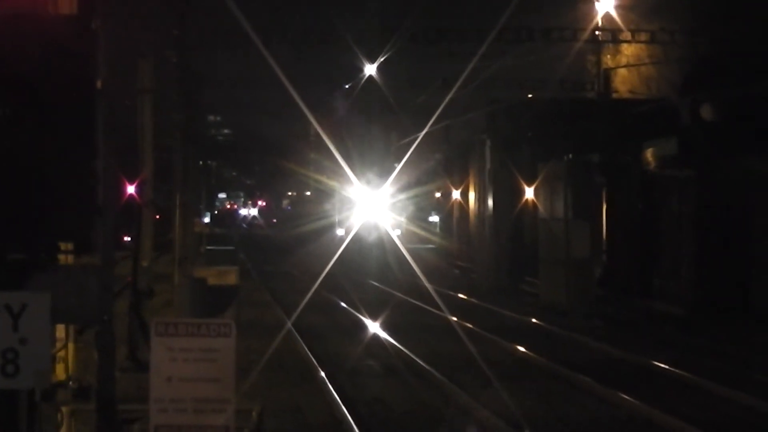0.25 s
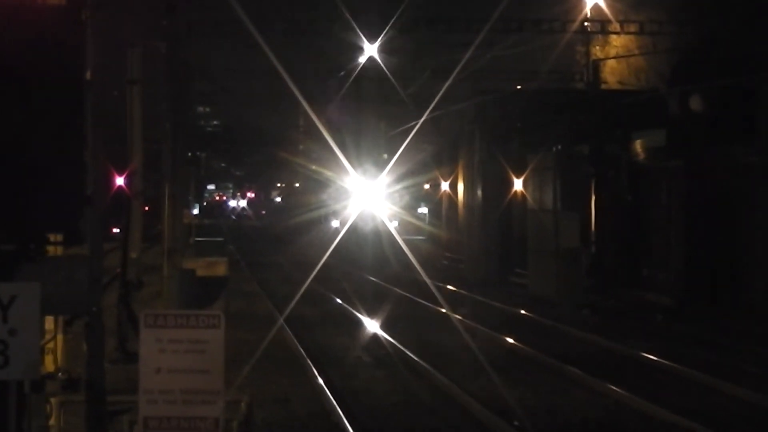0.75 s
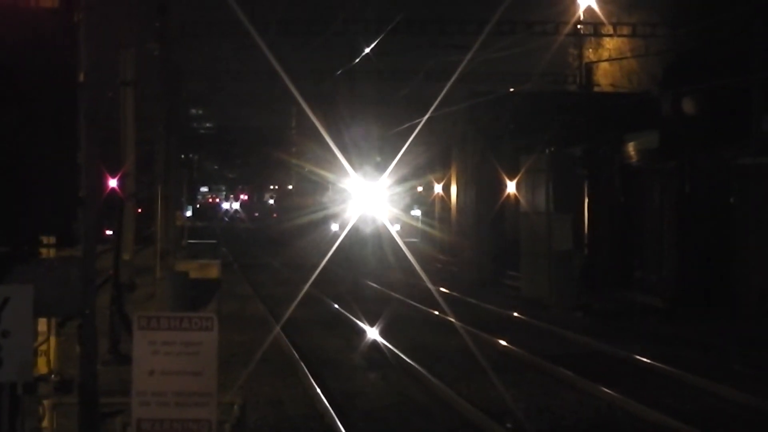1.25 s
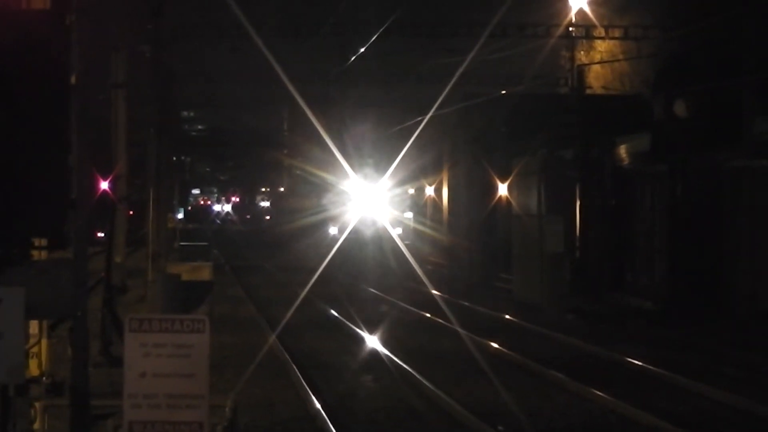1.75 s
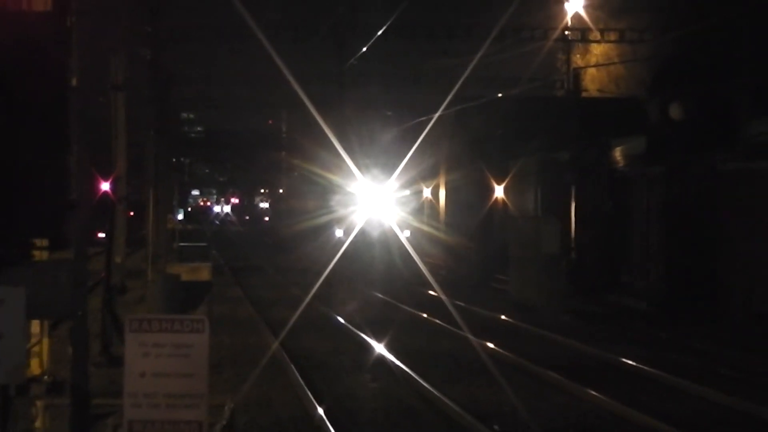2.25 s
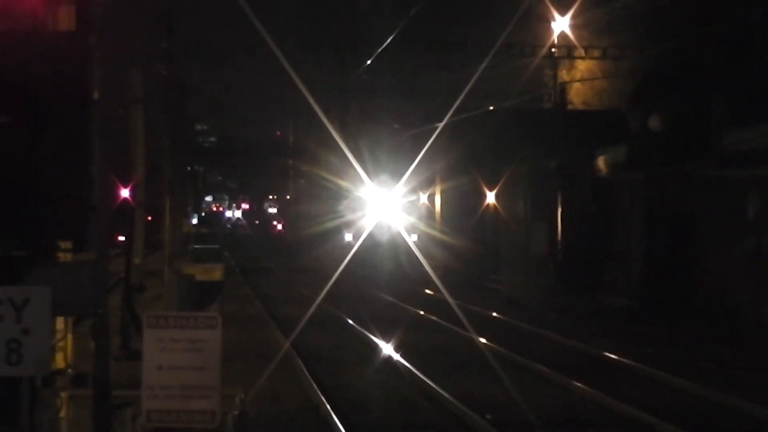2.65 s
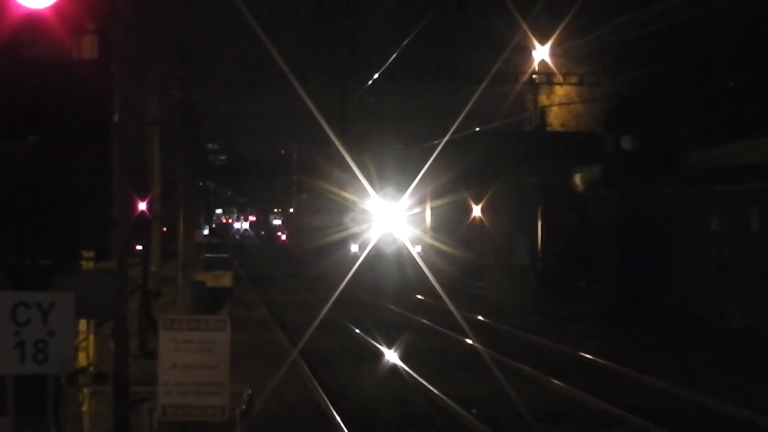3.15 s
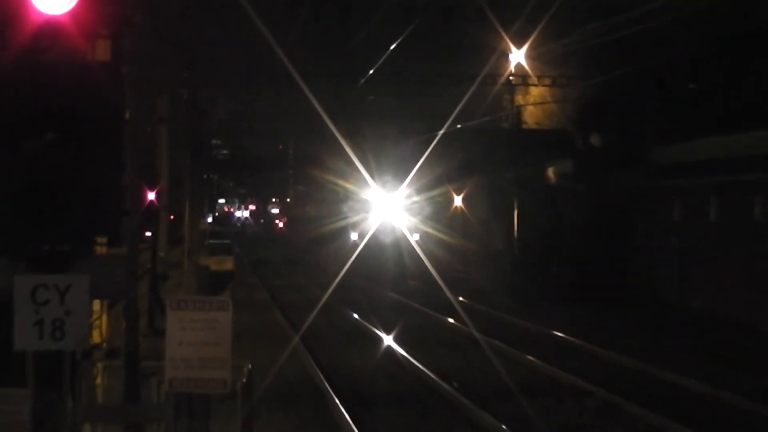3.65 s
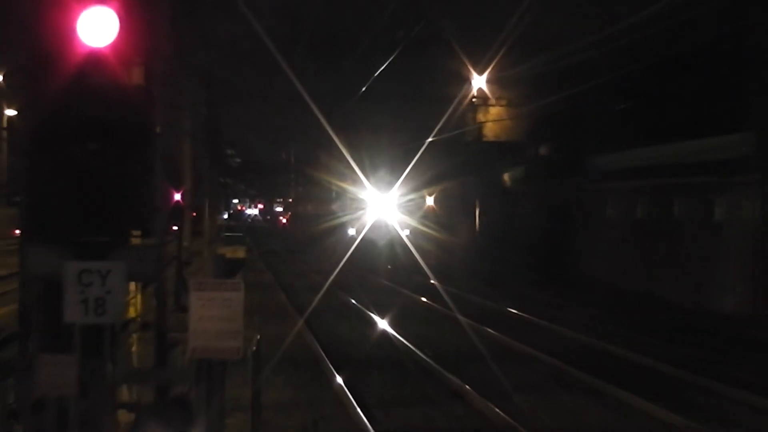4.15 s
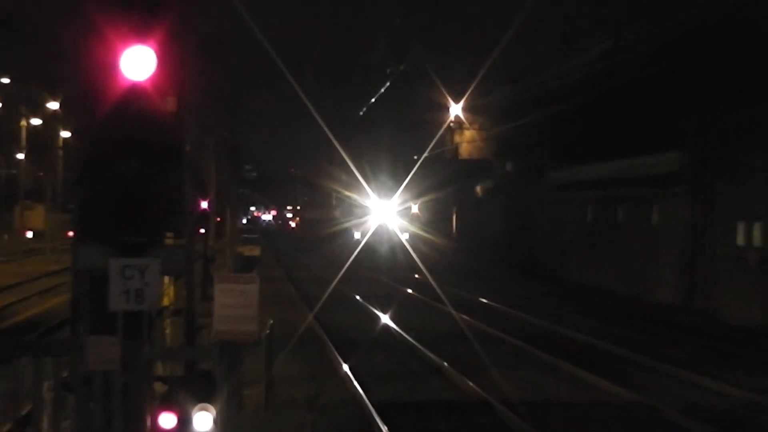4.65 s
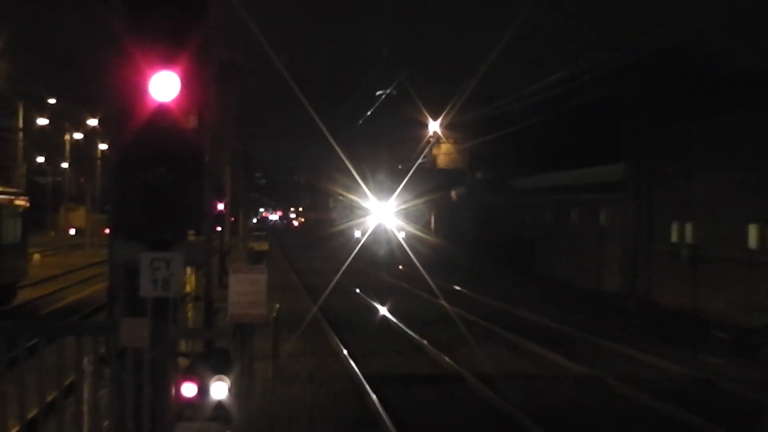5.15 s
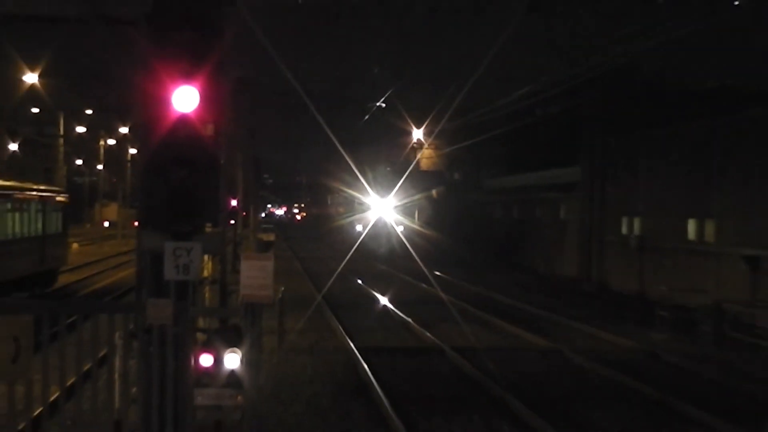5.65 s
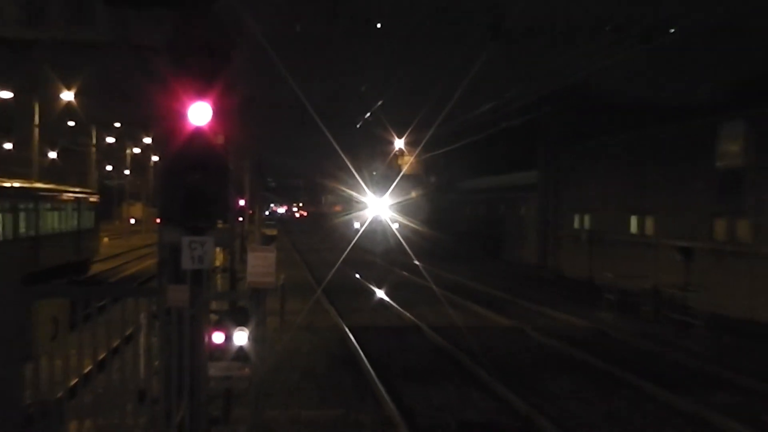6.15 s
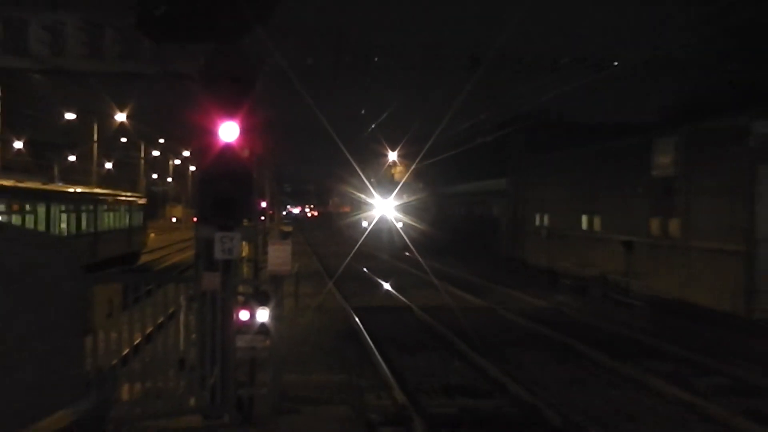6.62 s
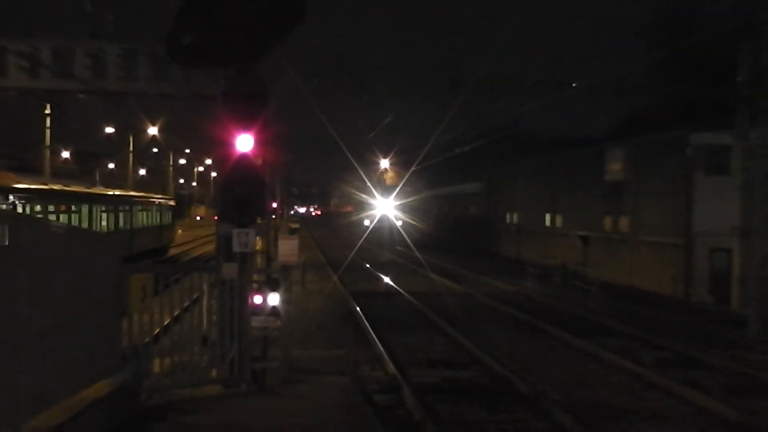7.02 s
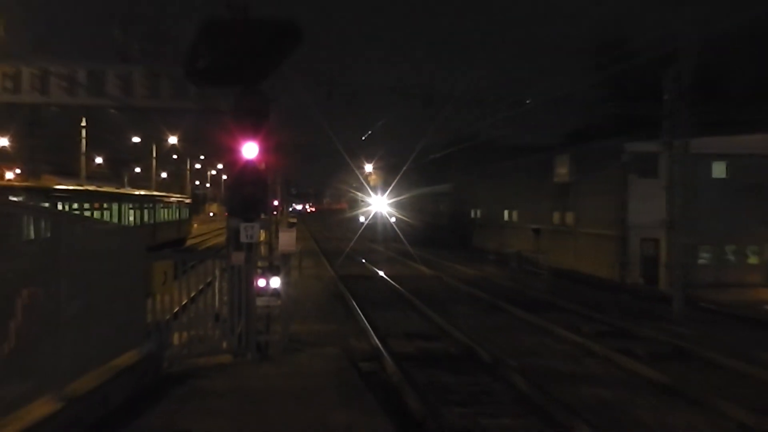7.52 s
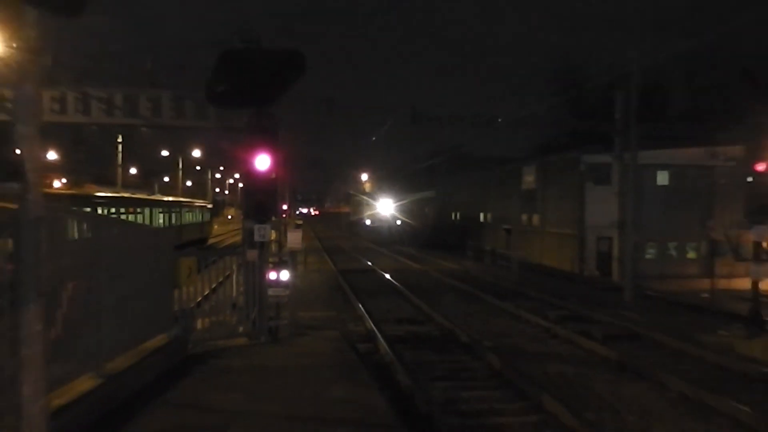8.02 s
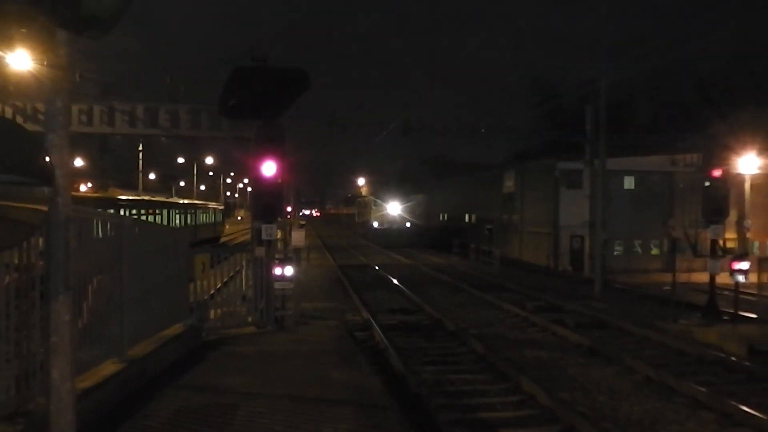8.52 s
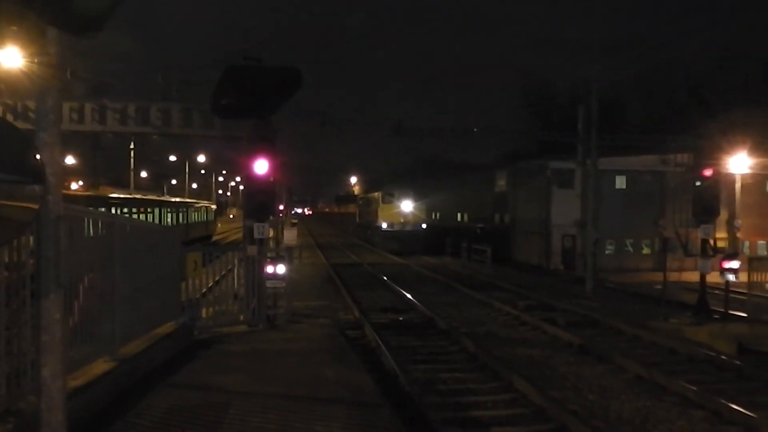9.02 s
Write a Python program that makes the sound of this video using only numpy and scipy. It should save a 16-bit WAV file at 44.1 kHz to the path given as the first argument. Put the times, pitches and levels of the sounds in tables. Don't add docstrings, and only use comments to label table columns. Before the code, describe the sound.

A distant low diesel drone with blower whine and small gear squeaks swells steadily into a close, pulsing engine roar in a rail yard.

```python
import sys
import numpy as np
from scipy import signal
from scipy.io import wavfile
from scipy.ndimage import uniform_filter1d, minimum_filter1d

SR = 44100
rng = np.random.default_rng(int(sys.argv[2]) if len(sys.argv) > 2 else 0)


def master_out(mix):
    frames = np.transpose(np.atleast_2d(mix))
    ceiling = np.clip(frames, -1, 1)
    pcm = np.round(ceiling * 32767).astype(np.int16)
    wavfile.write(sys.argv[1], SR, pcm)


def boost_factor(decibels):
    exponent = np.asarray(decibels, float) / 20
    return 10 ** exponent


N = 409248

# time in seconds, nearness from 0 (far) to 1 (near).
NEARNESS = [(0, 0.01), (2, 0.16), (4, 0.35), (6, 0.55), (7.5, 0.84), (8.5, 0.99), (9.28, 1.12)]
# time in seconds, body level in dB.
ROAR_BODY = [(0, -22.5), (1.3, -21.5), (2.1, -20.5), (2.5, -20.5), (3.4, -18.5), (4.3, -19), (4.6, -17),
             (5.6, -17.5), (6.5, -17.5), (7.1, -17), (7.6, -19), (8, -16.5), (8.3, -17), (8.9, -16.5),
             (9.28, -17)]
# time in seconds, ground level in dB, engine block level in dB.
RUMBLE_LEVELS = [(0, -40, -23.5), (.45, -38.5, -22.5), (.9, -40, -24.5), (1.05, -37.5, -25),
                 (1.6, -36, -26), (2.05, -36, -22), (2.5, -36, -21), (3.4, -33, -25), (4.2, -35, -21.5),
                 (4.5, -30.5, -25.5), (4.7, -33, -20.5), (6, -34, -20.5), (7.1, -37, -23.5),
                 (7.6, -47, -28.5), (8.2, -46, -24.5), (8.6, -38, -23.5), (9.28, -39.5, -26.5)]


def evened(x):
    return x / np.sqrt(np.mean(abs(x) ** 2) + 1e-20)


def curves(rows, t):
    s, *columns = np.transpose(rows)
    return [np.interp(t, s, c) for c in columns]


def read(points, hz, edge_db=None):
    f, value = np.transpose(points)
    return np.interp(np.log(hz + 1), np.log(f + 1), value, edge_db, edge_db)


def bump(t, s, rise, fall):
    return np.exp(-((t - s) / np.where(t < s, abs(rise), abs(fall))) ** 2)


def drift(top_hz, t):
    f = np.geomspace(top_hz / 20, top_hz, num=24)
    phase_turns = np.outer(t, f) + rng.random(len(f))
    return evened(np.sin(2 * np.pi * phase_turns) @ f ** -.5)


def slow(top_hz):
    t = np.arange(N) / SR
    return np.interp(t, t[::441], drift(top_hz, t[::441]))


def per_band(shape_db, band):
    return shape_db - 10 * np.log10((boost_factor(shape_db[band]) ** 2).sum(0))


def noise(level_db, same, size):
    # frequency in Hz, phase in radians by which left leads.
    lead = [(0, -0.27), (3790, -0.0), (5340, -0.16), (6720, 0.1), (7670, 1.2), (8180, 1.6), (9130, -1.0),
            (9730, -0.5), (11000, -0.1), (13300, 0.1), (15200, -0.0)]
    # frequency in Hz, left minus right in dB.
    balance_db = [(60, 2.4), (700, 1), (1290, 2.5), (2400, 1), (4400, 1), (6900, -3.5), (7700, 0.5),
                  (8400, 4), (9200, 2.5), (10500, -1), (15000, -1)]
    hz = np.fft.rfftfreq(size, 1 / SR)
    t = np.arange(4 * N // size + 5) * size / 4 / SR
    a, b, c, d = rng.standard_normal((len(t), len(hz), 4)).T
    likeness = np.clip(same(hz), -1, 1)[:, None]
    left = a + 1j * b
    shared = likeness * left * np.exp(-1j * read(lead, hz))[:, None]
    right = shared + np.sqrt(1 - likeness ** 2) * (c + 1j * d)
    tilt = boost_factor(read(balance_db, hz) / 2)[:, None]
    z = np.array([left * tilt, right / tilt]) * boost_factor(level_db(hz, t))
    return signal.istft(z, nperseg=size, noverlap=3 * size // 4)[1][:, :N]


def fuzzy_tone(hz, width_hz, core=0.45):
    r = np.exp(-np.pi * width_hz / SR)
    a, b = rng.standard_normal((2, N))
    wobble = evened(signal.lfilter([1], [1, -2 * r, r * r], a + 1j * b))
    carrier = np.exp(2j * np.pi * np.cumsum(hz * np.ones(N)) / SR)
    return evened(((core + wobble) * carrier).real)


def rumble():
    # frequency in Hz, level in dB per Hz.
    ground_shape = [(15, -17.5), (26, -12), (48, 2), (75, -5.5), (100, -10.5), (130, -29)]
    block_shape = [(60, -25.5), (90, -6), (120, 2), (150, 4), (195, 0), (255, 2.5), (300, -5.5), (330, -9),
                   (420, -30.5)]

    def level_db(hz, t):
        ground_db, block_db = curves(RUMBLE_LEVELS, t)
        ground = read(ground_shape, hz, edge_db=-92.0)[:, None]
        ground = per_band(ground, (hz > 22) & (hz < 75)) + ground_db - 1.5
        block = read(block_shape, hz, edge_db=-86)[:, None]
        block = per_band(block, (hz > 215) & (hz < 310)) + block_db - 3.5
        return 10 * np.log10(boost_factor(2 * ground) + boost_factor(2 * block))
    return noise(level_db, lambda hz: np.interp(hz, [40, 90], [.96, .99]), size=4096)


def clink():
    t = np.arange(N) / SR
    return boost_factor(-32) * bump(t, 5.11, 0.013, 0.013) * fuzzy_tone(4500, 150)


def wheel_moan():
    # time in seconds, pitch in Hz, level in dB.
    moan = [(1.6, 680, -59), (1.75, 700, -38), (2.05, 780, -33), (2.3, 790, -43), (2.45, 850, -28),
            (2.6, 870, -54)]
    t = np.arange(N) / SR
    moan_hz, moan_db = curves(moan, t)
    sounding = (t > moan[0][0]) * (t < moan[-1][0])
    return boost_factor(moan_db) * fuzzy_tone(moan_hz, 12) * sounding


def steady_tones():
    tone_hz = [284, 690, 799, 945, 1134, 1157, 1201, 1255, 1701, 1793, 2554, 3118, 3693]
    # width in Hz, level in dB against the roar body.
    tone_levels = [(3.7, -16), (14.3, -16.5), (5.3, -19.5), (2.9, -26), (10.1, -18.5), (3.4, -22),
                   (2.5, -18), (7.4, -23), (21, -21), (8.2, -24), (14, -34), (22, -39.5), (35, -34)]
    tones = sum(boost_factor(db) * fuzzy_tone(hz, width_hz) for hz, (width_hz, db) in zip(tone_hz, tone_levels))
    return boost_factor(curves(ROAR_BODY, np.arange(N) / SR)[0]) * tones


def swelling_tones():
    # pitch in Hz, width in Hz, level in dB against the roar between swells.
    swell_tones = [(567, 6, -19), (755, 5, -17), (851, 7, -18), (2836, 30, -34)]
    # time in seconds, half length in seconds, pitch in Hz, level in dB.
    swells = [(3.6, .4, 567, -38), (4.8, 0.29, 567, -38.5), (6.003, 0.13, 567, -38), (6.75, 0.18, 567, -39),
              (7.077, .05, 567, -27.5), (8.205, 0.049, 567, -30), (8.745, 0.054, 567, -22),
              (2.8, .3, 755, -34), (4.005, 0.24, 755, -38), (4.8, .07, 755, -31), (5.6, .4, 755, -33),
              (6.453, 0.22, 755, -25), (6.85, .07, 755, -32), (7.33, 0.064, 755, -34),
              (9.27, .05, 755, -33), (1, 0.44, 851, -41), (2.47, 0.038, 851, -27), (4.2, .15, 851, -38),
              (4.608, 0.072, 851, -32), (4.95, 0.031, 851, -29), (5.55, 0.035, 851, -32),
              (6.3, 0.064, 851, -24), (6.5, .08, 851, -24), (6.893, .13, 851, -27.5),
              (7.502, .07, 851, -22.5), (8.1, .15, 851, -38), (8.56, 0.039, 851, -22.5),
              (8.797, 0.077, 851, -28), (9.27, .04, 851, -31)]
    # time in seconds, level in dB.
    squeaks = [(.15, -42), (.43, -49), (.65, -51), (.77, -51), (.96, -46), (1.32, -42), (1.55, -48),
               (1.86, -48), (2.22, -42), (2.35, -40), (2.47, -46), (3.15, -47), (3.72, -47), (3.9, -44),
               (5.75, -46), (6.1, -46), (9.18, -45)]
    squeak_half_s = .035
    shaft_beat_hz, shaft_beat_depth = 283.6, 1.1
    t = np.arange(N) / SR
    body = boost_factor(curves(ROAR_BODY, t)[0])
    gains = [boost_factor(db) * body for _, _, db in swell_tones]
    for s, half_s, pitch_hz, db in swells:
        k = np.argmin([abs(row[0] - pitch_hz) for row in swell_tones])
        gains[k] = gains[k] + boost_factor(db) * bump(t, s, half_s, half_s)
    squeak = sum(boost_factor(db) * bump(t, s, squeak_half_s, squeak_half_s) for s, db in squeaks)
    beat = 1 + shaft_beat_depth * np.cos(2 * np.pi * shaft_beat_hz * t)
    gains[-1] = (gains[-1] + squeak) * beat
    return sum(gain * fuzzy_tone(hz, width_hz, core=2.2)
               for gain, (hz, width_hz, _) in zip(gains, swell_tones))


def whine():
    return (steady_tones() + swelling_tones() + wheel_moan() + clink()) * boost_factor([[.8], [-.8]])


def crank_turns():
    # time in seconds, speed in turns per second.
    crank = [(0, 15.853), (.5, 15.841), (1.5, 15.838), (2, 15.876), (3.5, 15.872), (4.5, 15.889),
             (5.5, 15.892), (7.5, 15.901), (9.28, 15.917)]
    start_turns = -.26
    return start_turns + np.cumsum(curves(crank, np.arange(N) / SR)[0]) / SR


def roar():
    # frequency in Hz, level in dB per Hz.
    far_shape = [(200, -29), (310, -15), (480, -15.5), (760, -7.5), (1230, -12), (1730, -15), (2430, -24),
                 (3300, -27), (4200, -23.5), (5200, -32), (6500, -41), (7600, -50), (9000, -60.5),
                 (12000, -84.5)]
    near_shape = [(200, -27.5), (310, -11.5), (430, -9.5), (690, -5.5), (1110, -8), (1760, -16),
                  (2700, -20), (4000, -16.5), (5500, -21), (8000, -31), (10500, -40.5), (11500, -47.5),
                  (13500, -45), (14200, -68)]
    # frequency in Hz, left-right likeness.
    likeness = [(60, .98), (300, .985), (700, .98), (1400, .93), (2400, .94), (4400, .88), (6800, .7),
                (9000, .5), (15000, .4)]
    # time in s, rise in s, fall in s, body change in dB, further hiss change in dB.
    gust_rows = [
        (.98, .03, 0.061, -0.4, 3),
        (2.2, 0.035, .6, 0.8, 2.5),
        (5.01, 0.015, 0.034, -3.5, 0),
        (6.47, .06, 0.03, 2.5, .1),
        (6.8, 0.045, 0.057, -0.9, 3),
        (7.17, 0.037, .06, -2, -1),
        (8.05, 0.023, 0.057, -2.1, 0.8),
        (8.25, 0.062, .1, 1.7, 1),
        (8.87, 0.031, .15, -3.5, 2.9),
        (9.17, 0.042, 0.023, 2.5, 0),
    ]
    hiss_far_db, hiss_near_db, hiss_power = -15, -12.5, 2

    def level_db(hz, t):
        near = curves(NEARNESS, t)[0]
        body_db = curves(ROAR_BODY, t)[0]
        hiss_db = hiss_far_db + (hiss_near_db - hiss_far_db) * near.clip(0) ** hiss_power
        for s, rise_s, fall_s, body_change_db, hiss_change_db in gust_rows:
            gust = bump(t, s, rise_s, fall_s)
            body_db = body_db + body_change_db * gust
            hiss_db = hiss_db + hiss_change_db * gust
        shape = np.outer(read(far_shape, hz), 1 - near) + np.outer(read(near_shape, hz), near)
        body = per_band(shape, (hz > 400) & (hz < 2200)) + body_db
        hiss = per_band(shape, (hz > 2500) & (hz < 6000)) + body_db + hiss_db
        upper = np.clip((hz - 2000) / 500, 0, 1)[:, None]
        patches = rng.standard_normal((len(t), len(hz))).T
        patches = uniform_filter1d(patches, size=8, axis=0)
        patches = evened(uniform_filter1d(patches, size=24, axis=1))
        flutter_db = 0.6 * drift(14, t) + 0.48 * near * drift(8, t)
        flutter_db = np.outer(np.clip(hz / 4000, .3, 1.5), flutter_db)
        return (1 - upper) * body + upper * hiss + 0.84 * patches + flutter_db
    throb = boost_factor(0.69 * np.cos(2 * np.pi * (crank_turns() + 0.36)))
    return throb * noise(level_db, lambda hz: read(likeness, hz), size=512)


def exhaust():
    # time in seconds, order 9 in dB, tilt in dB toward the higher orders.
    echo = [(0, -21, 5), (.25, -16.5, -4.5), (.75, -17, 0.5), (1.4, -15.5, 0.5), (1.75, -15, -1.5),
            (2.0, -15.5, -3.5), (2.3, -15.5, -0.5), (3, -13.5, -0.5), (3.75, -13, 0), (4.5, -12.5, -0.7),
            (4.75, -12.5, 1.5), (5, -13, 0.3), (6, -14, 1.5), (7.1, -9.5, -0.3), (7.5, -12, -2.1),
            (8.4, -11, -7), (8.75, -12.5, -1.1), (9.28, -9.5, -5)]
    # order, dB against order 9, share of the tilt, extra dB once close, waver in dB.
    main_orders = [(6, -23, -.3, 9.5, 3.5), (7, -18, -0.15, 8.5, 3.7), (8, -9.5, -.6, 2, -0.7),
                   (10, -0.8, 0.87, -0.5, 0), (11, -14, 1.2, -7, 1.3)]
    # order, dB against the ground (orders 2-5), the block (13-18) or else order 9.
    weak_orders = [(2, -13), (3, -3.5), (4, -9.5), (5, -7), (12, -18.5), (13, -25), (14, -26), (15, -19.),
                   (16, -20), (17, -23), (18, -21.5), (20, -28), (21, -30.5), (23, -26.5), (25, -39)]
    close_power = 5.9
    boom_s, boom_half_s, boom_db_per_order = 8.72, .3, 3.8
    t, turns = np.arange(N) / SR, crank_turns()
    nine_db, tilt_db = curves(echo, t)
    close = curves(NEARNESS, t)[0].clip(0, 1) ** close_power
    ground_db, block_db = curves(RUMBLE_LEVELS, t)
    block_db = block_db + 10.7
    boom_db = boom_db_per_order * bump(t, boom_s, boom_half_s, boom_half_s)

    levels = {9: nine_db}
    for k, db, share, close_db, waver_db in main_orders:
        k = round(k)
        steady_db = nine_db + db + share * tilt_db
        levels[k] = steady_db + close_db * close + waver_db * slow(2.5) + boom_db * max(8 - k, 0)
    wander_rad = dict.fromkeys(levels, 0)
    for k, db in weak_orders:
        k = int(k)
        waver, slip = slow(2.5), slow(2.5)
        reference_db = ground_db if k < 6 else block_db if 12 < k < 19 else nine_db
        levels[k] = reference_db + db + (2. if k > 12 else 1.5) * waver
        wander_rad[k] = (.03 if k < 18 else .1) * k * slip * (k > 12)

    out = np.zeros(N)
    for k, level_db in levels.items():
        if k < 12:
            lag_rad = 1.65 * (1 - np.exp(-(k - 9) ** 2 / 2)) + .335 * (k - 9) ** 3 - 1
        else:
            lag_rad = 2.6
        out += np.sqrt(2) * boost_factor(level_db) * np.cos(2 * np.pi * k * turns + lag_rad + wander_rad[k])
    return out * boost_factor([[.75], [-.75]])


def scene():
    return rumble() + whine() + roar() + exhaust()


def self_noise():
    # frequency in Hz, level in dB per Hz.
    hiss_shape = [(3000, -4), (9000, 0), (15900, 0)]
    top_hz, top_fade_db, top_power = 13800, -8, 6.

    def level_db(hz, t):
        shape = per_band(read(hiss_shape, hz, edge_db=-66.5)[:, None], hz > 10000)
        deeper = 1 + 3 * (drift(12, t) > .1)
        fade_db = top_fade_db * curves(NEARNESS, t)[0].clip(0) ** top_power * deeper
        return shape - 64.3 + np.outer(hz > top_hz, fade_db)
    return noise(level_db, lambda hz: 0.57 + 0 * hz, size=512)


def ticks():
    # time in seconds, level in dB.
    jumps = [(4.9881, -46), (5.1138, -42), (5.4246, -42), (5.7434, -47), (5.8686, -41), (5.932, -47),
             (5.9953, -46), (6.1146, -46), (6.1844, -41), (6.2463, -38), (6.3096, -38), (6.4907, -40),
             (6.5616, -43), (6.6244, -46), (6.8753, -41), (6.9382, -42), (7.1203, -44), (7.3118, -43),
             (7.3782, -45), (7.4455, -40), (7.5039, -44), (7.6306, -45), (7.701, -43), (7.8811, -47),
             (7.9449, -39), (8.3844, -41), (8.5136, -43)]
    melt_s = .00003
    out, t = np.zeros(N + 400), np.arange(400) / SR
    for (s, db), sign in zip(jumps, rng.choice([-1., 1.], len(jumps))):
        out[round(s * SR):][:400] += sign * boost_factor(db + 18.) * np.exp(-t / melt_s)
    return out[:N] * boost_factor([[-1.5], [1.5]])


def gain_control(dry):
    power_db = 10 * np.log10(abs(uniform_filter1d((dry ** 2).mean(0), size=600)) + 1e-12)
    over_db = uniform_filter1d(np.maximum(power_db + 12.0, 0), size=300)
    held = dry / boost_factor(0.16 * over_db)
    peak = abs(held).max(0)
    room = np.minimum(.99 / (peak + 1e-9), 1)
    return held * uniform_filter1d(minimum_filter1d(room, size=81), size=81)


def band_limit(x):
    return signal.sosfilt(signal.butter(12, 15790, fs=SR, output="sos"), x)


def record(dry):
    mix = gain_control(dry) + ticks() + self_noise()
    return band_limit(mix)


dry = scene()
out = record(dry)
master_out(out)
```